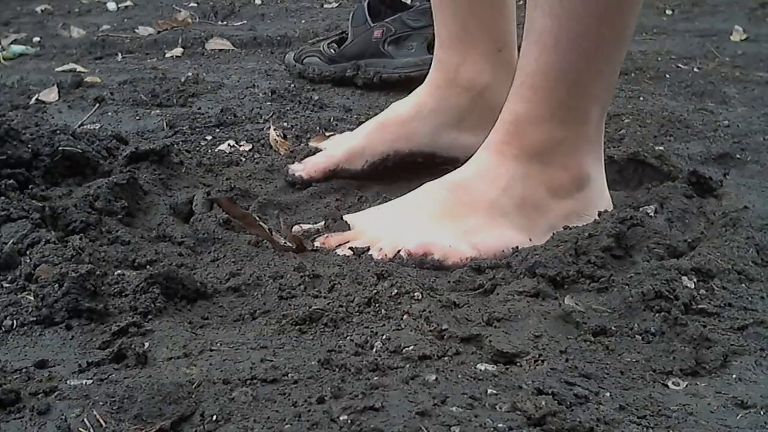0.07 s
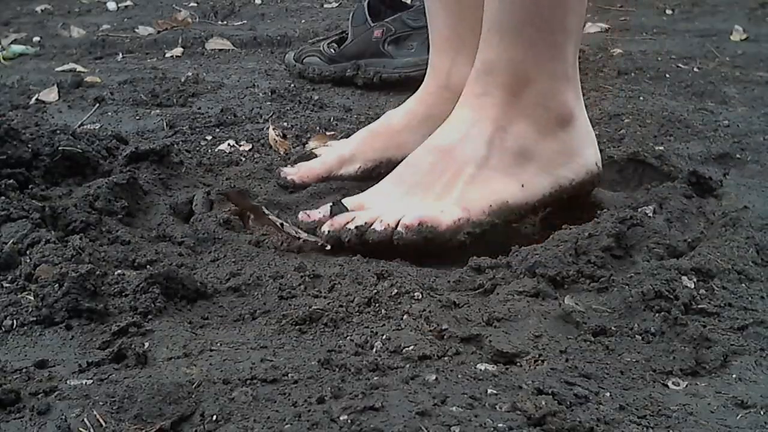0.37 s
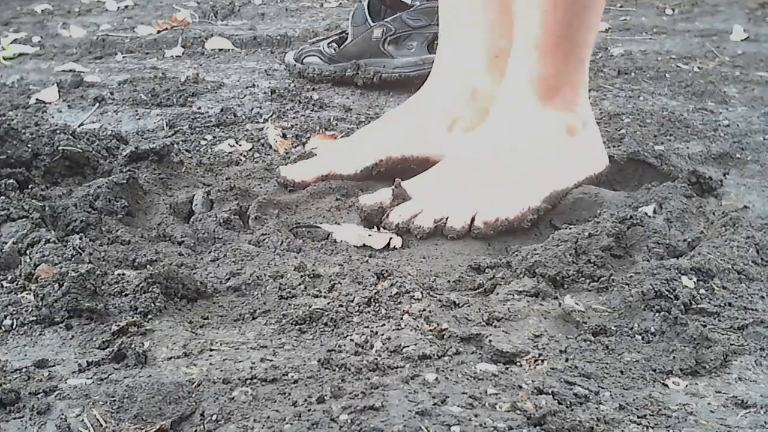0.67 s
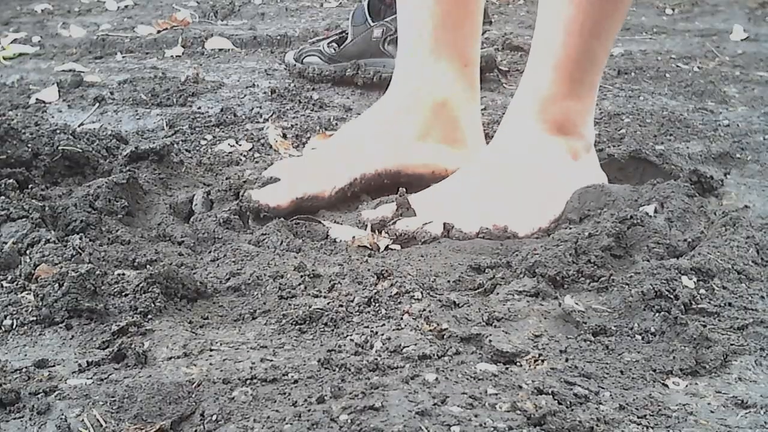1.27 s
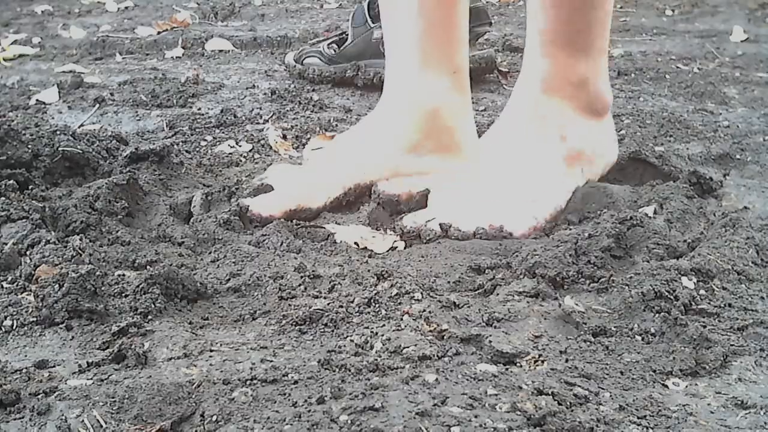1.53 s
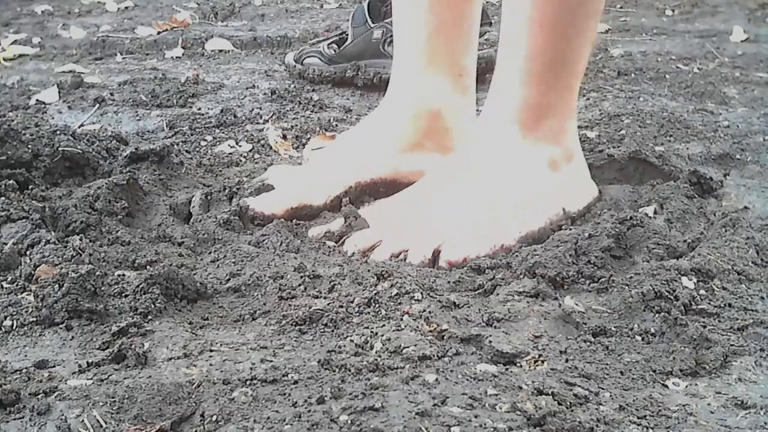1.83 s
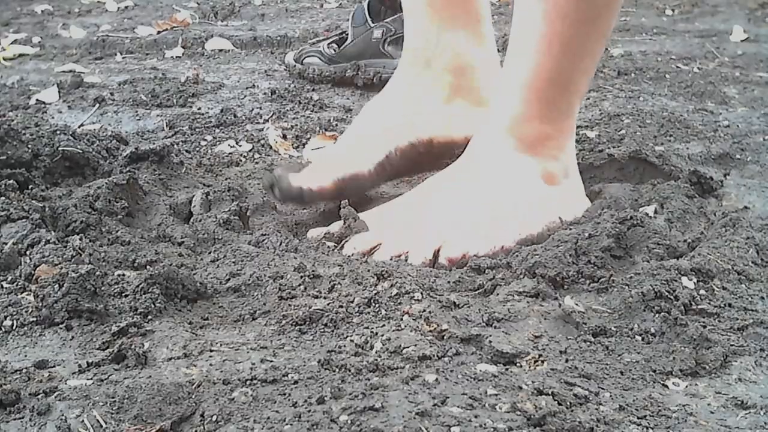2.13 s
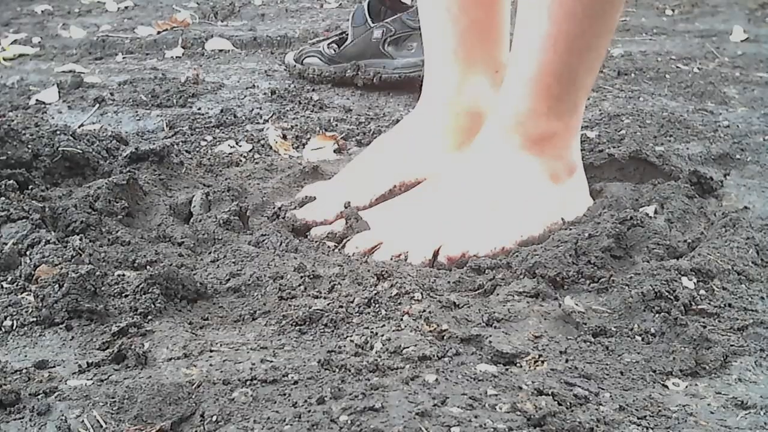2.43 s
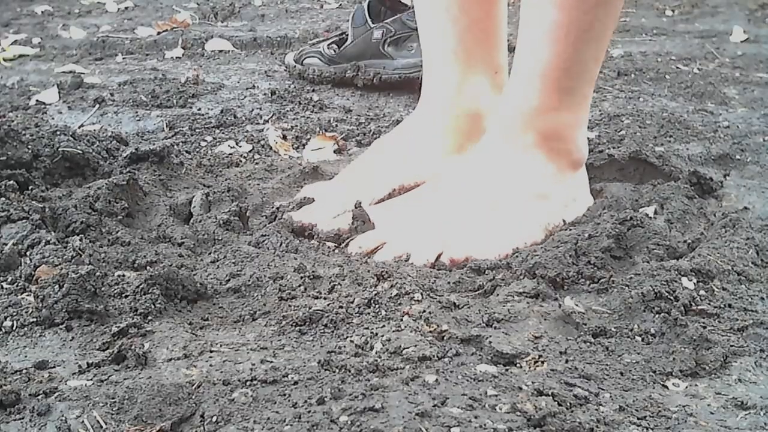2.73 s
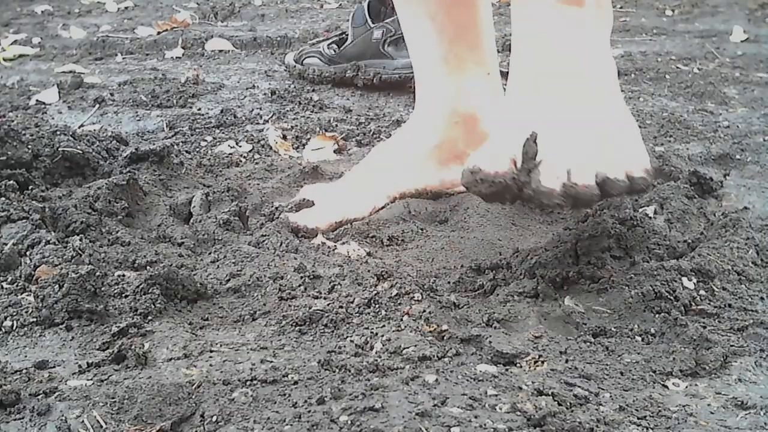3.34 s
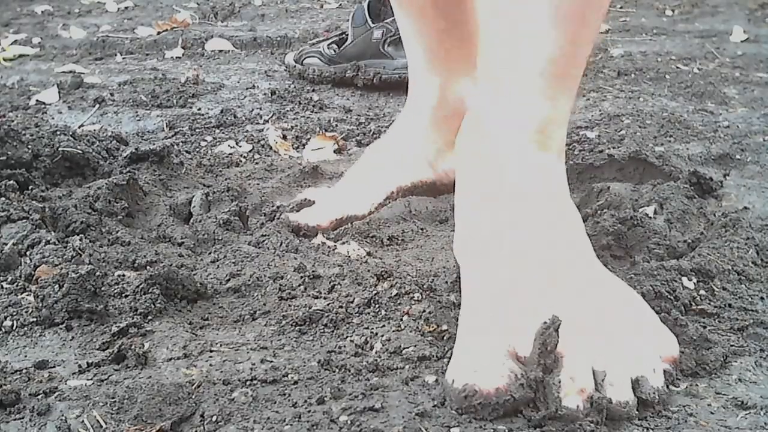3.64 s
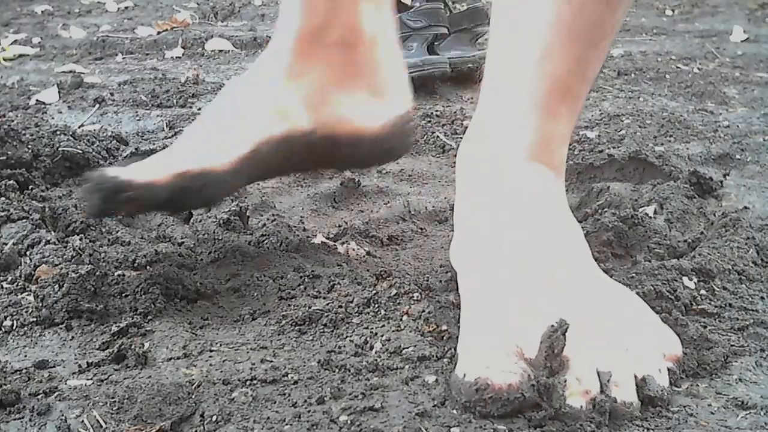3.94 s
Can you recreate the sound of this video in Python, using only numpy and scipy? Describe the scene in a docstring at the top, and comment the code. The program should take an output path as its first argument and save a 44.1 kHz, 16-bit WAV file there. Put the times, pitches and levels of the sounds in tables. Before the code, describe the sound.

Bare feet squelch faintly in thick wet mud, with small wet snaps, at about 0.2 seconds, 0.9, from 1.3 to 1.9, at 2.8 and around 3.6. One short rising bubble plop follows near 3.8 seconds. Wind rumbles and thumps on the microphone from the start, hardest in the first second and a half, then easing. A steady camera hiss and thin motor whine run underneath.

```python
"""Camera hiss and steady motor whine run throughout; everything is mono.
Gusts buffet the microphone from the start, hardest in the first second and a half.
From 0.1 s bare feet tread thick wet mud: tiny pores burst in faint squelches, a few wet films snap.
Near 3.8 s an air pocket opens with one rising bubble plop."""
import sys
import numpy as np
from scipy.fft import rfft, irfft, next_fast_len
from scipy.io import wavfile
from scipy.ndimage import uniform_filter1d, map_coordinates

SR = 44100
rng = np.random.default_rng(int(sys.argv[2]) if len(sys.argv) > 2 else 0)


def materialize(psi):
    """Save the field psi as 16-bit PCM at rate SR to the path in sys.argv[1].

    A 1-D psi becomes a single channel; in a 2-D psi each row is a channel.
    """
    bounded = np.clip(np.atleast_2d(psi).T, -1, 1)
    quanta = np.round(bounded * 32767).astype(np.int16)
    wavfile.write(sys.argv[1], SR, quanta)


N = 176400


def amp(db):
    """Decibels to gain."""
    return 10 ** (np.asarray(db) / 20)


def unit(x):
    """Scale to rms 1."""
    return x / np.sqrt(np.mean(x ** 2) + 1e-20)


def wobble(knots_per_s):
    """Smooth random curve."""
    return map_coordinates(rng.standard_normal(512), [np.arange(N) * knots_per_s / SR], mode="wrap")


def level(rows):
    """(time_s, level_db) points to dB per sample."""
    return np.interp(np.arange(N) / SR, *np.transpose(rows))


def filtered(x, response):
    """Apply a gain given as a function of Hz."""
    size = next_fast_len(len(x) + 8192)
    hz = np.fft.rfftfreq(size, 1 / SR) + 1
    return irfft(rfft(x, size) * response(hz), size)[:len(x)]


def coloured(x, spectrum, tilt_db_per_oct=0):
    """Shape x by (freq_hz, gain_db) points and a tilt; rms 1."""
    freq_hz, gain_db = np.transpose(spectrum)

    def response(hz):
        curve_db = np.interp(np.log(hz), np.log(freq_hz), gain_db)
        return amp(curve_db + tilt_db_per_oct * np.log2(hz / freq_hz[0]))
    return unit(filtered(x, response))


def noise(spectrum):
    """Coloured noise, rms 1."""
    return coloured(rng.standard_normal(N), spectrum)


def even(x, span_s):
    """Flatten the slow swells of a noise."""
    power = np.abs(uniform_filter1d(x ** 2, max(int(span_s * SR), 2)))
    return x / np.sqrt(power + .03)


def add(track, start_s, sound):
    """Mix a sound into the track."""
    part = track[max(round(start_s * SR), 0):][:len(sound)]
    part += sound[:len(part)]


def camera():
    """The running camera whines and hums in slightly wavering tones over its hiss."""
    # motor tones: pitch_hz, rms_db
    whine = [(1739, -74), (1798, -63), (1986, -74), (2051, -73), (2110, -74), (3068, -80), (3989, -71),
             (4990, -67), (5986, -76), (6982, -78), (7983, -64), (8979, -63), (9981, -66), (10977, -77),
             (11972, -76), (12974, -78), (13970, -80), (14966, -70)]
    hum = [(90, -48.5), (209, -53.5), (240, -61), (416.5, -70), (522, -69.5), (745.4, -71.5),
           (1676.5, -73.5)]
    # hiss spectrum: freq_hz, gain_db
    hiss = [(150, -6.5), (300, -0.5), (480, -8), (800, -9.5), (1150, -9.5), (1450, -12), (2000, -13),
            (2850, -17.5), (3300, -15.5), (4200, -19), (7000, -20.5), (9300, -21.5), (11000, -26),
            (15600, -25.5)]
    tones, t = np.zeros(N), np.arange(N) / SR
    for pitch_hz, rms_db in list(whine) + list(hum):
        gain = np.sqrt(2) * amp(rms_db + .74 * wobble(12))
        phase_rad = 2 * np.pi * (pitch_hz * t + rng.random()) + .099 * wobble(9.2)
        tones += gain * np.sin(phase_rad)
    return tones + amp(-51) * noise(hiss)


def wind():
    """Wind rumbles and flutters on the microphone; hard gusts shed smaller, brighter eddies."""
    # spectra, low to high: freq_hz, gain_db
    rumble_spectrum = [(8, -7.5), (20, -1), (35, -2), (62, -2), (100, -10), (140, -21), (250, -61),
                       (600, -120)]
    flutter_spectrum = [(20, -15), (60, -16.5), (95, 0), (130, -2), (170, -5), (230, -12.5), (320, -23.5),
                        (500, -40), (1400, -120)]
    eddy_spectrum = [(100, -18), (190, -10.5), (270, -3), (380, -1.5), (500, -17.5), (700, -24.5),
                     (2000, -120)]
    # rumble and gust contours: time_s, relative_db
    rumble_contour = [(0.03, -25), (1.17, -23.5), (1.21, -28), (1.25, -20.5), (1.38, -33), (1.84, -33),
                      (1.95, -20.5), (1.98, -32), (2.06, -25), (2.09, -40), (2.29, -30.5), (2.38, -38),
                      (2.43, -25), (2.49, -35), (2.52, -26.5), (2.63, -35.5), (3.88, -37.5), (3.97, -30)]
    gust_contour = [(.02, -25), (.13, -37.5), (.18, -28), (.27, -26), (.3, -43), (.42, -43.5), (.49, -49),
                    (.53, -30.5), (.61, -27), (.7, -27.5), (.78, -37), (.86, -32.5), (.93, -39.5),
                    (.99, -24), (1.03, -28), (1.15, -22.5), (1.2, -34.5), (1.25, -29), (1.3, -53),
                    (1.82, -49.5), (1.87, -31), (1.895, -52), (1.92, -37), (2.1, -48), (2.48, -53),
                    (2.54, -40), (2.6, -47.5), (2.87, -54), (2.94, -44.5), (3.2, -53), (3.97, -53.5)]
    hard_gust_db, hard_eddy_db, eddy_db_per_db = -21.5, -35.5, 2
    gust_db = level(gust_contour)
    rumble_db = level(rumble_contour) - .5 + 1.37 * wobble(16)
    rumble = amp(rumble_db) * even(noise(rumble_spectrum), span_s=.159)
    flutter_db = gust_db + 2.5 + 1.25 * wobble(30)
    flutter = amp(flutter_db) * even(noise(flutter_spectrum), span_s=.065)
    eddy_db = hard_eddy_db + eddy_db_per_db * (gust_db - hard_gust_db) + 3 * wobble(60)
    eddies = amp(eddy_db) * even(noise(eddy_spectrum), span_s=.067)
    return rumble + flutter + eddies


def bubbles():
    """An air pocket rings and rises in pitch as its mouth opens."""
    # air pockets: start_s, peak_db, final_hz, glide_fraction, swell_s
    pockets = [(.099, -49, 1230, .15, .007), (.143, -44, 3400, .08, .004), (3.7885, -27, 1150, .75, .0058),
               (3.8005, -38, 1330, .3, .003)]
    glide_s, end_steepness = .0024, 3
    out, t = np.zeros(N), np.arange(SR // 20) / SR
    for start_s, peak_db, final_hz, glide_fraction, swell_s in pockets:
        pitch_hz = final_hz * (1 - glide_fraction * np.exp(-t / glide_s))
        envelope = t / swell_s * np.exp((1 - (t / swell_s) ** end_steepness) / end_steepness)
        add(out, start_s, amp(peak_db) * envelope * np.sin(2 * np.pi * np.cumsum(pitch_hz) / SR))
    return out


def squelches():
    """A foot squeezes or peels mud: a swell of tiny bursting pores over a wet smear."""
    # squeezes: peak_s, rise_s, fall_s, level_db, tilt_db_per_oct
    squeezes = [(.152, 0.038, 0.03, -49, -.5), (.219, 0.018, 0.011, -48.5, 4),
                (0.251, 0.035, .012, -47.5, 1.5), (.864, .035, 0.017, -52.5, 1.5),
                (1.361, 0.048, 0.083, -53.5, -1), (1.465, 0.046, 0.026, -54.5, -1),
                (1.655, 0.0076, 0.012, -47.5, 1), (1.805, 0.031, 0.041, -51.5, 0),
                (1.84, .012, 0.013, -48, 0), (1.88, 0.026, .016, -49, -2.5),
                (2.829, 0.013, 0.064, -53.5, -1), (3.549, 0.015, 0.017, -49.5, 3.5),
                (3.628, 0.053, 0.019, -49, 0), (3.652, .006, 0.0084, -50.5, 5)]
    # mud spectrum: freq_hz, gain_db
    mud = [(400, -36), (1000, 3.5), (2200, 5.5), (2750, -1), (3280, 7), (3750, 0), (4600, -2.5),
           (7500, 0.5), (10000, -6), (15500, -18)]
    pores_per_s, spread_db = 2000, 3.5
    out, t = np.zeros(N), np.arange(SR * 3 // 10) / SR - .15
    for peak_s, rise_s, fall_s, level_db, tilt_db_per_oct in squeezes:
        sizes = amp(spread_db * np.minimum(rng.exponential(size=len(t)), 4))
        signs = np.sign(rng.standard_normal(len(t)))
        bursts = rng.random(len(t)) < pores_per_s / SR
        crackle = unit(sizes * signs * bursts)
        smear = .4 * rng.standard_normal(len(t))
        swell = amp(level_db - 10 * np.abs(t / np.where(t < 0, rise_s, fall_s)) ** 1.15)
        add(out, peak_s + t[0], swell * coloured(crackle + smear, mud, tilt_db_per_oct))
    return out


def snaps():
    """Wet films of mud break with a short, dead tick."""
    # breaking films: start_s, relative_db, centre_hz, width_oct, t60_s
    films = [(.158, -37, 4500, 0.88, 0.011), (0.253, -26, 10500, 2.2, 0.018),
             (.864, -40, 3220, 0.093, .035), (1.6495, -29, 6550, .35, .01),
             (1.658, -25.5, 8150, 0.39, 0.0058), (1.6842, -24, 6850, 0.49, 0.0064),
             (1.7395, -32, 14000, 0.8, .012), (1.874, -40, 3350, .14, 0.038),
             (2.83, -35.5, 3000, 0.14, 0.035), (3.013, -36.5, 4560, 0.12, 0.028),
             (3.0146, -41, 11000, 0.83, 0.024), (3.597, -23.5, 4000, 1.4, 0.0042),
             (3.5975, -30, 844, 0.61, 0.039), (3.623, -34.5, 3170, 0.12, 0.026),
             (3.977, -41, 13500, .4, .015)]
    attack_s = .00037
    out, t = np.zeros(N), np.arange(SR // 10) / SR
    for start_s, relative_db, centre_hz, width_oct, t60_s in films:
        white = rng.standard_normal(len(t))
        band = unit(filtered(white, lambda hz: np.exp(-.5 * (np.log2(hz / centre_hz) / width_oct) ** 2)))
        envelope = amp(relative_db - 60 * t / t60_s) * (1 - np.exp(-t / attack_s))
        add(out, start_s, .5 * band * envelope)
    return out


def thumps():
    """Single buffets and soft thuds: one dull push of air each, no ring."""
    # air pushes: peak_s, peak_db, centre_hz
    pushes = [(.18, -19, 213), (.21, -19, 278), (0.533, -15, 126), (0.546, -31, 323), (0.606, -17.5, 240),
              (.632, -19, 284), (.684, -22, 290), (.745, -13, 111), (.993, -20, 242), (1.138, -21, 282),
              (1.158, -13.5, 175), (1.251, -18, 126), (1.865, -21.5, 176), (2.54, -37, 140)]
    out, t = np.zeros(N), np.arange(-SR // 40, SR // 40) / SR
    for peak_s, peak_db, centre_hz in pushes:
        exponent = (np.pi * centre_hz * t) ** 2
        pulse = (1 - 2 * exponent) * np.exp(-exponent)
        add(out, peak_s + t[0], amp(peak_db) * pulse)
    return out


def scene():
    """Feet, wind and camera, alike in both channels."""
    feet = squelches() + snaps() + bubbles()
    mono = feet + wind() + thumps() + camera()
    return np.array([mono, mono])


def record(dry):
    """Camera band limit; right channel a touch louder."""
    top_hz, balance_db = 15750, [[-.08], [.08]]
    return np.array([filtered(side, lambda hz: hz < top_hz) for side in dry]) * amp(balance_db)


dry = scene()
out = record(dry)
materialize(out)
```